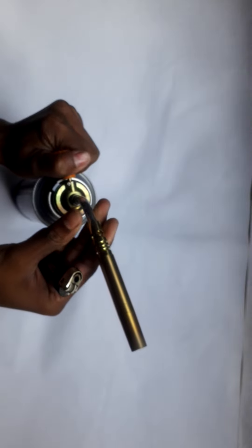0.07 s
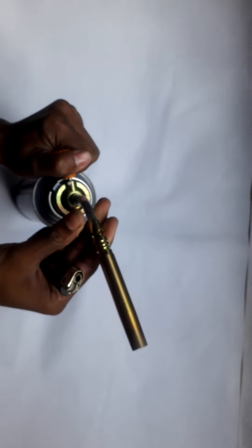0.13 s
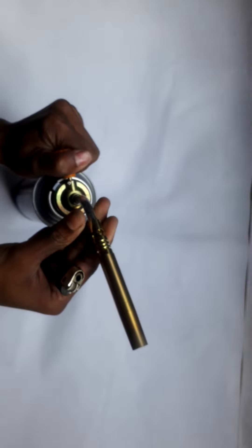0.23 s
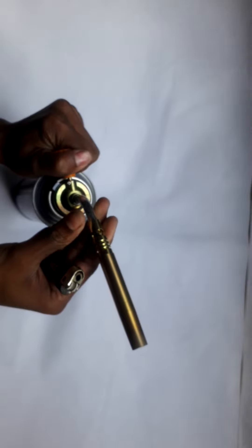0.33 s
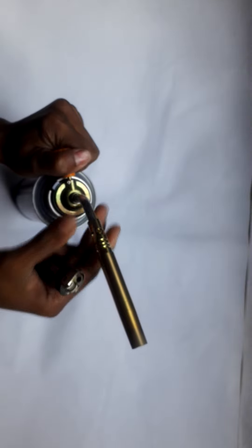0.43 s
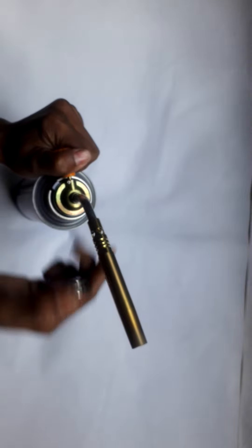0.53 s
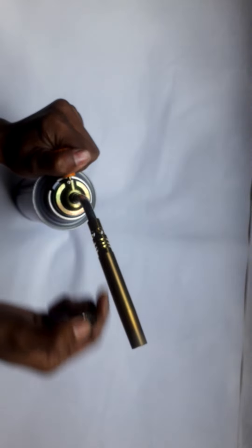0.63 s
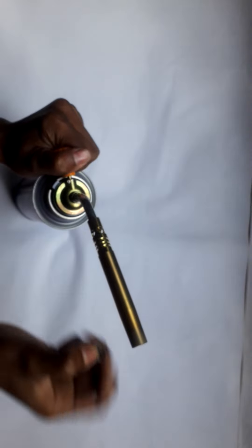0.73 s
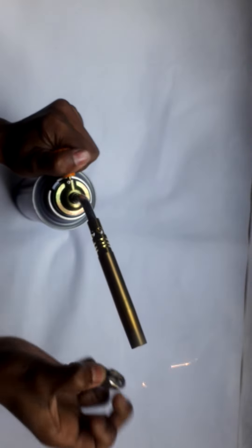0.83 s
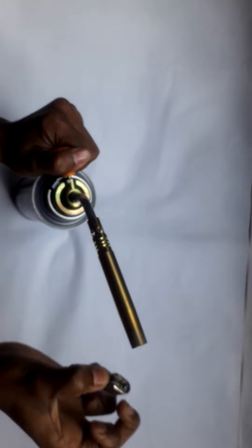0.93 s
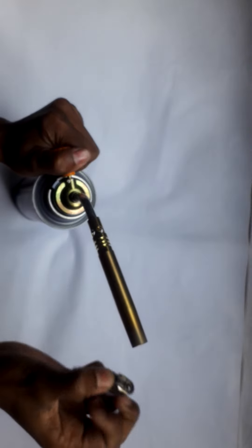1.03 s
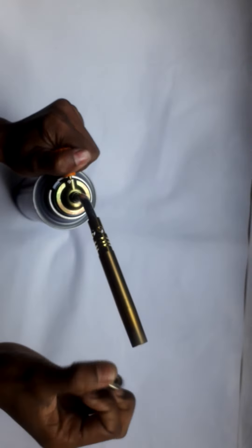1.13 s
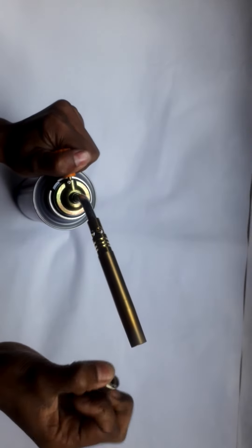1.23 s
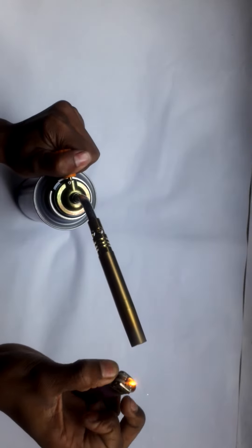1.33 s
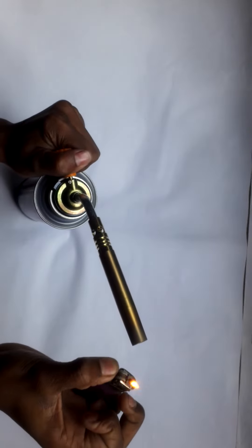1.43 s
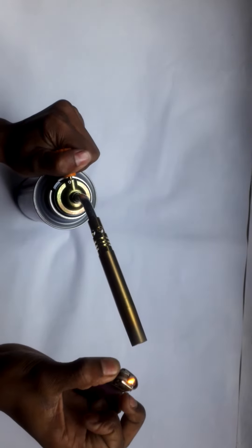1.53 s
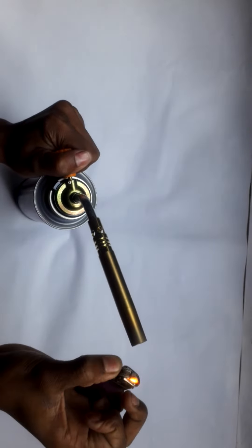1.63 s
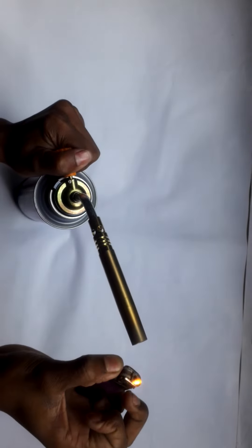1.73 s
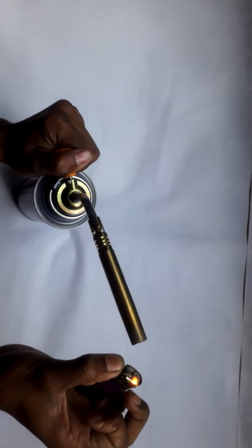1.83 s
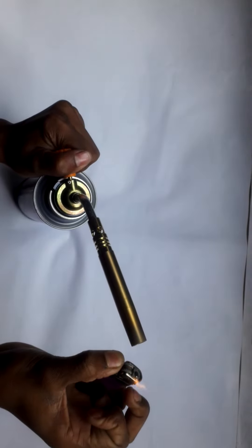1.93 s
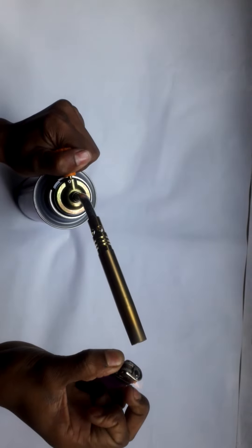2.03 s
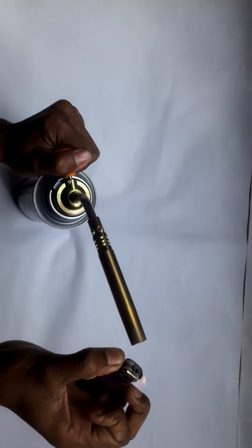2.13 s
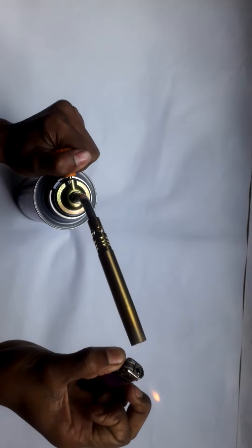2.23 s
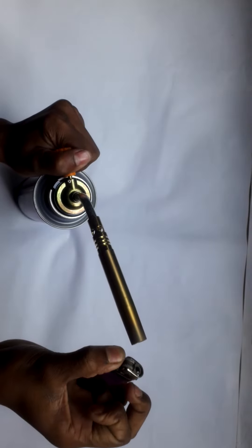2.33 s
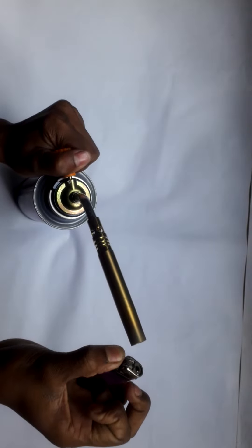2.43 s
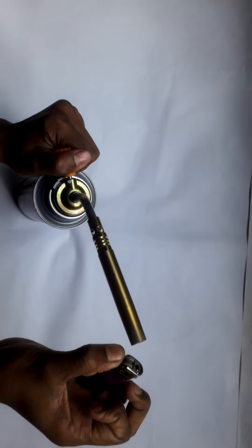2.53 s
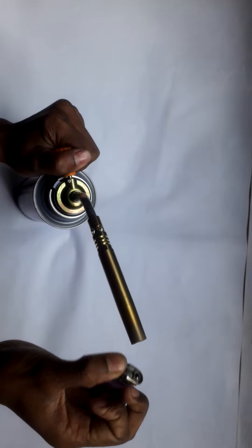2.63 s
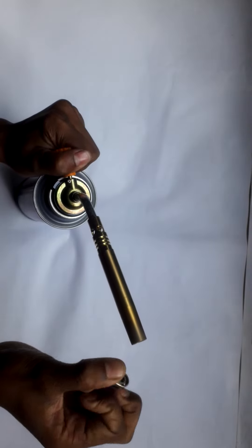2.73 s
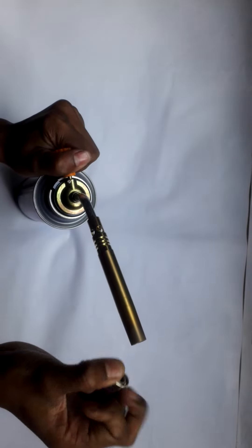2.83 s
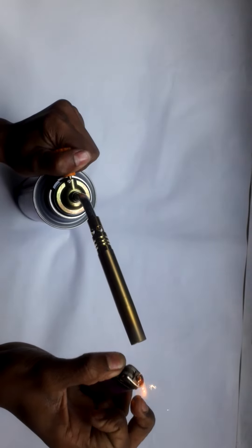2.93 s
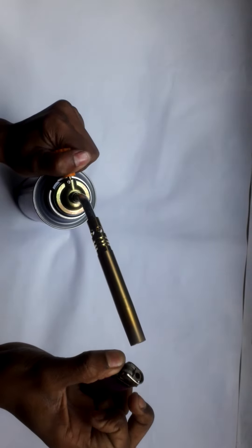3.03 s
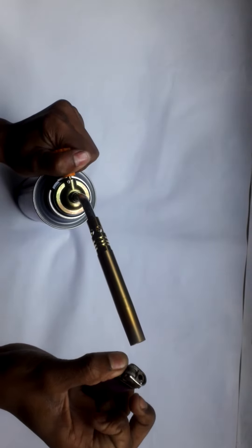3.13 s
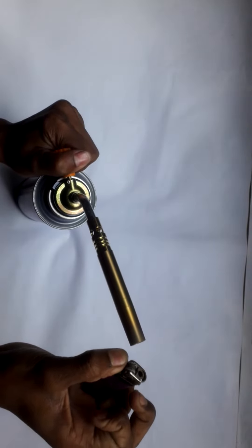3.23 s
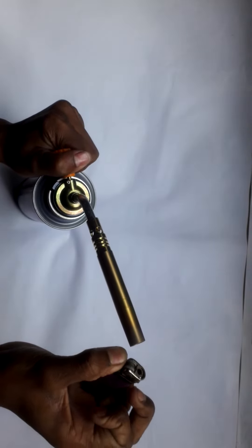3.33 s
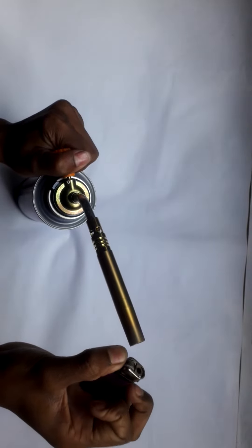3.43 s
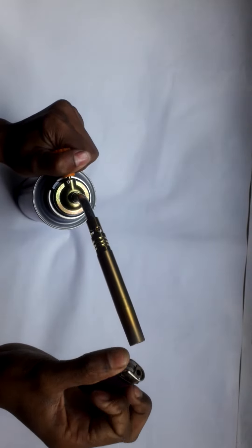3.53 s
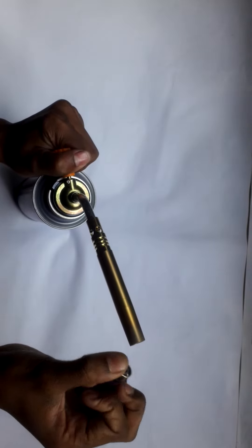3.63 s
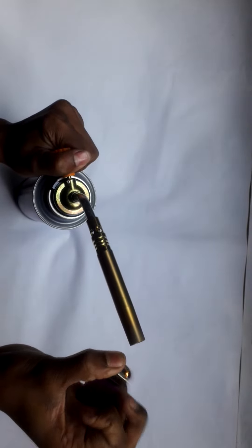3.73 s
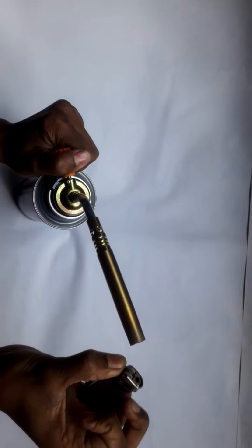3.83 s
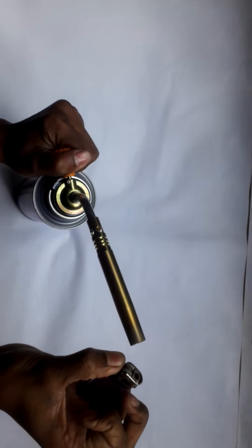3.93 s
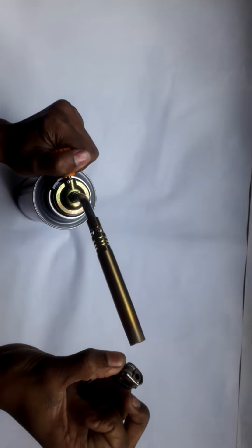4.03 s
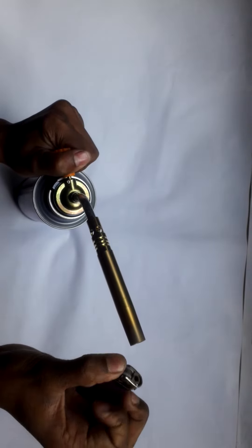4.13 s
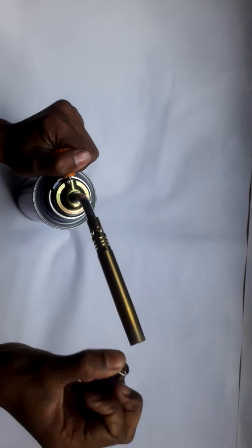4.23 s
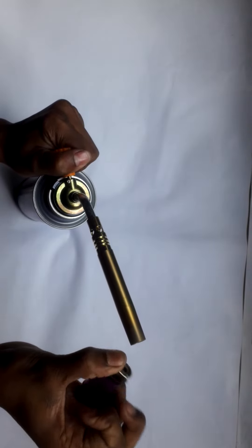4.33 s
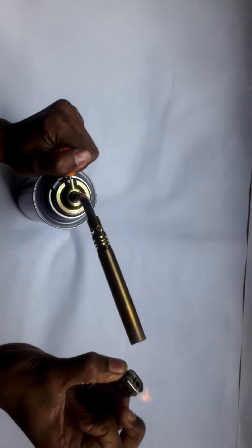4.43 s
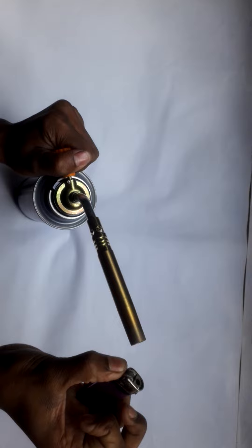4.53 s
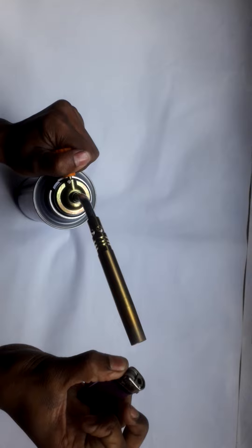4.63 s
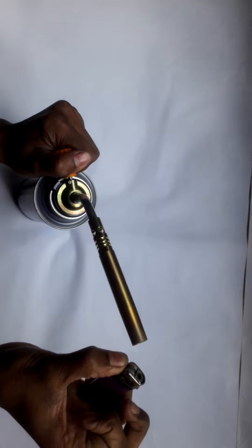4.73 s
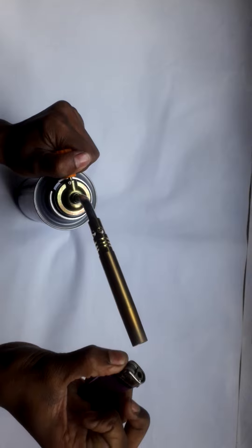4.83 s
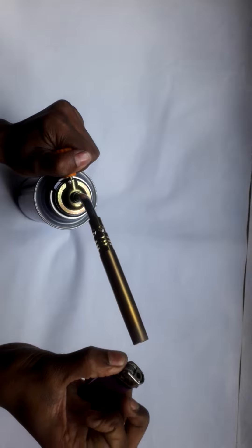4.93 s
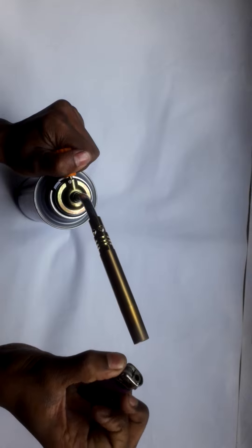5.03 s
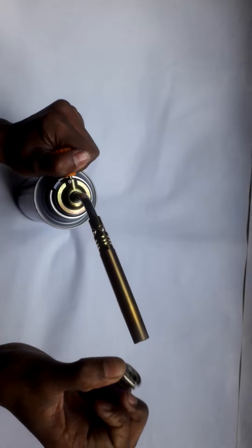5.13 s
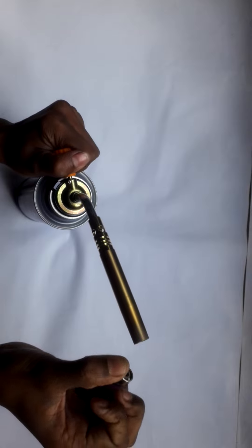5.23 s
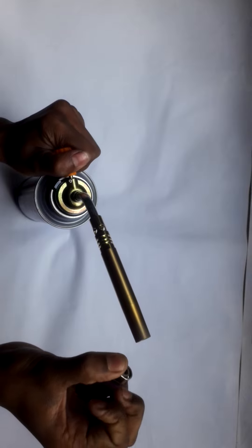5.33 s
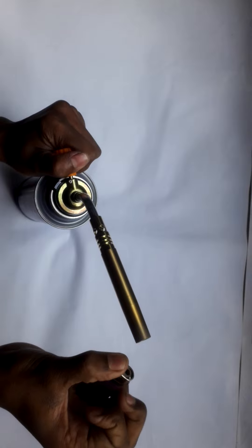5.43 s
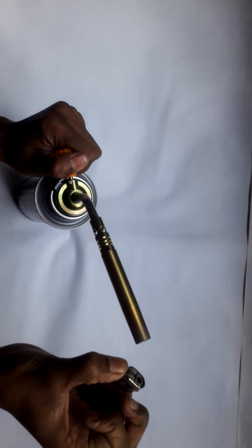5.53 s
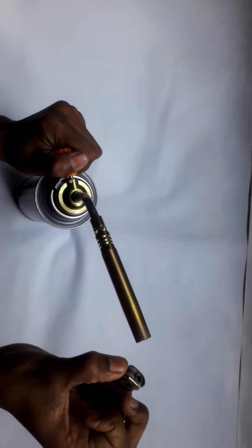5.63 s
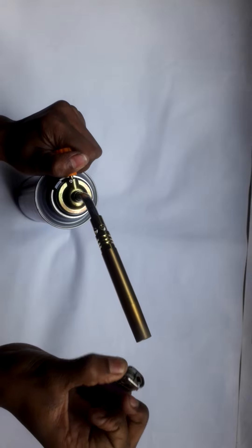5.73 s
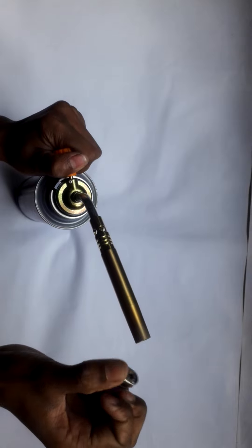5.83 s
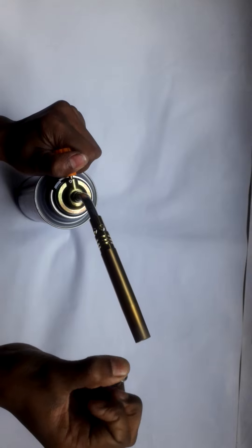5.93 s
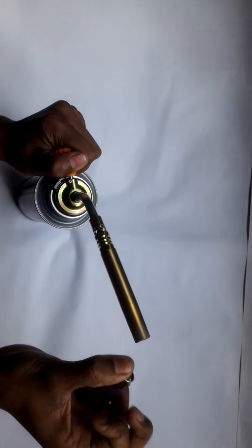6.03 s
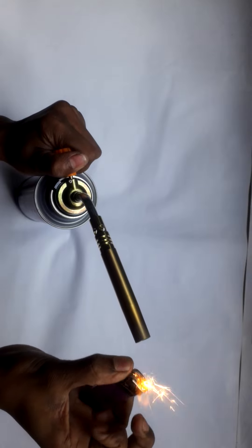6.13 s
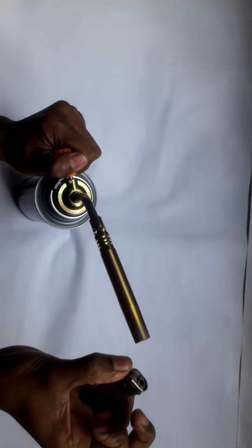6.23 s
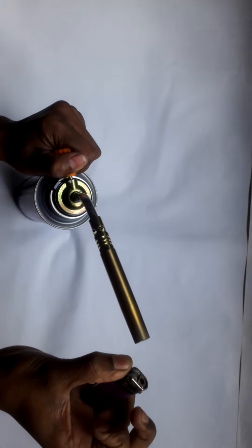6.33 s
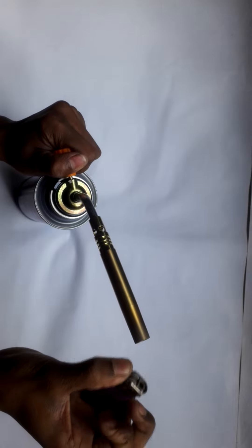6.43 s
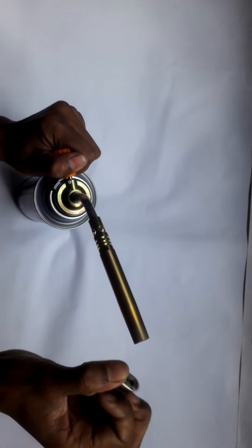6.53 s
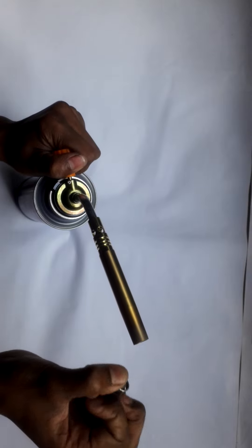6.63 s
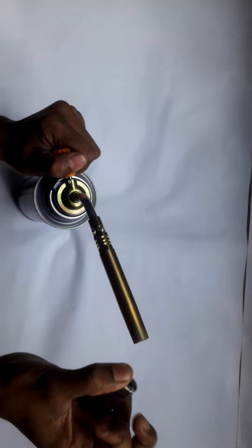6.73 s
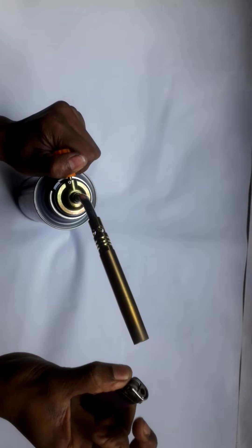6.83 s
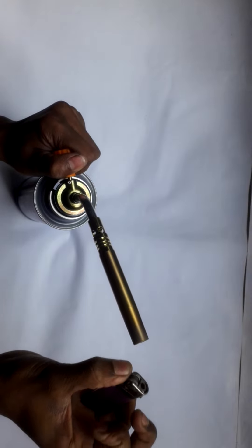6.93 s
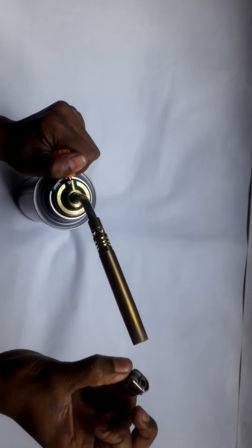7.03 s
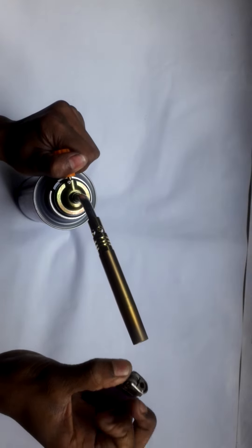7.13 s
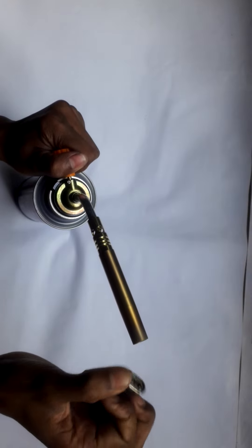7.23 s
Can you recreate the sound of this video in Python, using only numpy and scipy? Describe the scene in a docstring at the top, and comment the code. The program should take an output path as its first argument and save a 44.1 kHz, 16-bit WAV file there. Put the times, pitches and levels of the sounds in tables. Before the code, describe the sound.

In a quiet room, close up, a valve spits briefly and a hand scuffs. Unlit gas begins as a faint whistling hiss from a slim metal tube. A flint lighter is struck eight times, each a crisp rasp with a small low puff. One flame flutters and blows out. The gas ebbs, then swells into a loud turbulent hiss after five seconds and settles slightly.

```python
"""In a quiet room a valve spits, then butane hisses unlit through a brass torch tube whose air column whistles.
The hand scuffs, and a flint lighter is struck again and again: each rasp brings a puff that does not hold.
Faint tones glide far away as the gas ebbs; one flame flutters and is blown out. The flow then surges, turns
turbulent and eases. Filtered noise makes the gas, flint, flame and room; sines make knocks and far tones."""
import sys
import numpy as np
from scipy import signal
from scipy.fft import irfft, next_fast_len
from scipy.io import wavfile
from scipy.ndimage import uniform_filter1d

SR = 44100
rng = np.random.default_rng(int(sys.argv[2]) if len(sys.argv) > 2 else 0)


def int16_out(signal):
    """Quantize to a 16-bit WAV file."""
    q = np.round(np.clip(np.atleast_2d(signal).T, -1, 1) * 32767)
    wavfile.write(sys.argv[1], SR, q.astype(np.int16))


N = 320607

# Colour tables hold spectral density: frequency_hz, relative_db (each noise is later scaled to unit power).
# In all tables left_db is the left level over the right, and lead_rad the phase lead of the left.

# still room: frequency_hz, relative_db
ROOM_COLOUR = [(25, -18), (55, -3), (110, 1), (200, -4.5), (500, -7), (1000, -11.5), (1600, -15.5),
               (1950, -4), (2300, -13.5), (4000, -23), (9000, -25), (16000, -28)]
ROOM_T60_S = 0.38

# first spit of the opening valve: level_db, attack_s, hold_s, t60_s
SPIT_ENVELOPE = (-68, 0.015, 0.075, 0.5)
SPIT_AT_S = 0.129
# colour of the spit: frequency_hz, relative_db
SPIT_SPECTRUM = [(4200, -24), (5000, -4), (6300, -8), (7700, 0.5), (8600, -6), (9500, -24)]

# gas flow as the hand works the valve: time_s, flow_db (relative)
GAS_FLOW = [(0.19, -132), (0.27, -88), (0.42, -69), (0.77, -60.5), (1.05, -60), (1.3, -56), (1.58, -67),
            (2.45, -65.5), (3.3, -69), (3.53, -56.5), (3.8, -52), (4.72, -50.7), (4.91, -43.8),
            (5.14, -43.5), (5.42, -39.5), (5.8, -44), (6.45, -48), (7.27, -49.5)]
# lowest tube resonance: frequency_hz, width_hz, relative_db, left_db, lead_rad
TUBE_WHISTLE = (1355.5, 72, 0, -3.5, 0.62)
# upper tube resonances: frequency_hz, width_hz, level_db (at a flow of -47.5 dB), left_db, lead_rad,
# growth (dB per dB of flow)
TUBE_OVERTONES = [(3402, 115, -56.5, -11, -1.5, 0.56), (5224, 235, -52.5, -7.5, -2, 0.76),
                  (6954, 200, -46, -7.5, -2, 1.0), (7360, 390, -58, -6.5, -3, 1.5),
                  (7920, 180, -52.5, 3.5, 3.5, 1.2), (8260, 266, -46.5, -4.5, 4, 1.36),
                  (10170, 170, -62, -15, -2.1, 1.5)]
# turbulence around the resonances, low to high: frequency_hz, relative_db
ROAR_COLOUR = [(150, -33), (400, -21.5), (750, -9), (1100, -15), (1300, -2), (1550, 5), (1800, -7),
               (2300, -9), (3000, -21), (4500, -51)]
HISS_COLOUR = [(2700, -26), (3100, -4.5), (3750, -2), (4250, -5.5), (4900, -12.5), (5650, 2), (6100, 0.5),
               (6700, 0.5), (7550, -6.5), (8600, 4), (9200, -22), (11000, -9), (15000, -42)]
SIZZLE_COLOUR = [(3000, -20.5), (6000, -13), (9500, -1.5), (10400, 1.5), (11100, -3.5), (12000, 8),
                 (12600, 1), (13600, 4), (14500, 5.5), (15700, -3), (17000, -10)]
# around this flow the jet breaks into full turbulence, over a range of this width
BREAKUP_DB, BREAKUP_WIDTH_DB = -46.5, 2.4
# smooth jet at that flow: relative level; then dB per dB of flow, and rise once turbulent
WHISTLE_DB, WHISTLE_GROWTH, WHISTLE_SURGE_DB = -56, 0.41, 15.5
SIZZLE_DB, SIZZLE_GROWTH, SIZZLE_SURGE_DB = -65, 0.65, 21

# hollow scuff as the hand draws away: start_s, level_db, attack_s, hold_s, t60_s
SCUFF_ENVELOPE = (0.572, -57, 0.075, 0.02, 0.45)
# colour of the scuff: frequency_hz, relative_db
SCUFF_SPECTRUM = [(200, -30.5), (340, -17), (410, -4.5), (470, 0.5), (550, -17), (800, -28), (1000, -17),
                  (1200, -24), (2500, -33)]

# flint wheel strikes, each lighting a puff of gas: rasp_peak_s, rasp_db, half_length_s, thump_db, pop_db
# (rasp and thump relative)
FLINT_STRIKES = [(.862, -25, 0.0038, -53.5, -63.5), (1.3203, -26.5, .003, -50, -68),
                 (2.9244, -23, .0032, -42.5, -56), (3.803, -25, 0.0034, -43.5, -53),
                 (4.4067, -25, .003, -39, -62), (5.523, -32, .0055, -47, -42.5),
                 (6.174, -21.5, .002, -39, -50.5), (6.8065, -25, .0029, -39, -55)]
# the thumb nudges the wheel without a spark: time_s, relative_db, half_length_s
WHEEL_NUDGES = [(2.7165, -50, .0016), (5.865, -35, .001), (6.567, -32, 0.0018)]
# the wheel's run-up lies this far under the rasp; the gas catches this long after it
RUN_UP_DB, IGNITION_DELAY_S = -15.5, 0.01314
# colour of the flint's rasp: frequency_hz, relative_db
RASP_COLOUR = [(150, -28), (700, -16), (1500, -8.5), (2700, -9), (3300, -6), (4400, 2.5), (5300, -1.5),
               (7300, 2.5), (8900, 0.5), (9400, 1), (11500, 1.5), (14000, -4), (16000, -5)]
# ring of the lighter's steel hood: frequency_hz, width_hz, added_gain_db (relative to the rasp's colour)
HOOD_RING = [(8050, 180, 8.5), (8820, 140, 9.5)]
# the wheel sliding before it bites: frequency_hz, relative_db
SLIDE_COLOUR = [(1500, -26), (4000, -7), (6500, -5), (7900, 5), (8800, -17), (9600, -11), (12000, -9),
                (16000, -20)]
# the lighter's case knocks in the hand: start_s, frequency_hz, relative_db, t60_s
CASE_KNOCKS = [(0.86, 1753, -34, 0.03), (.862, 690, -49, 0.062)]

# the jet blows the flame out: time_s, thump_db (relative), pop_db
FLAME_BLOWOUTS = [(2.318, -39, -69), (5.565, -48, -46.5)]
# colour of the flame's rumble: frequency_hz, relative_db
RUMBLE_COLOUR = [(25, -30), (50, -4), (90, 1), (135, 2), (200, -4.5), (280, -17), (600, -27), (1000, -42),
                 (2500, -61)]
# colour of the flame's dry pop: frequency_hz, relative_db
POP_COLOUR = [(100, -12), (220, 0), (800, 6), (1200, -12), (3000, -26)]
# before the first blowout the flame flutters harder and harder: length, final level, growth
FLUTTER_S, FLUTTER_DB, FLUTTER_GROWTH_DB_PER_S = 0.426, -56, 20

# faint far tones: start_s, length_s, start_hz, end_hz, relative_db, octave_db (relative to the fundamental)
FAR_GLIDES = [(1.522, 0.31, 1028, 1070, -71.5, -6), (1.868, 0.28, 1077, 1050, -75, -2),
              (3.885, 0.23, 730, 625, -70, -21), (4.755, 0.23, 730, 676, -74, -20),
              (6.278, .33, 652, 601, -73, -18), (6.857, 0.42, 509, 482, -71, -20)]
FAR_BREATHINESS = 0.85  # amplitude weight of the noisy part, 0-1

CUTOFF_HZ = 15760


def from_db(db):
    """Logarithmic level: 20 dB is a tenfold amplitude."""
    return np.exp(np.maximum(db, -300) * np.log(10) / 20)


def rms_one(x):
    """Normalisation: scale to unit mean power."""
    return x / np.sqrt(np.mean(x ** 2) + 1e-20)


def seconds():
    """Sampling: the time of every sample."""
    return np.arange(N) / SR


def bins_hz():
    """Discrete spectrum: frequencies of the FFT grid, kept above zero for logarithms."""
    return np.fft.rfftfreq(next_fast_len(N + 64, True), 1 / SR) + 1e-3


def colour(points):
    """Spectral shaping: gain interpolated in dB over logarithmic frequency."""
    hz, db = np.transpose(points)
    return from_db(np.interp(np.log(bins_hz()), np.log(hz), db))


def resonance(hz, width_hz):
    """Damped resonance: a rounded peak whose far skirts fall away steeply."""
    off = (bins_hz() - hz) / width_hz
    return 1 / np.sqrt((1 + (2 * off) ** 2) * (1 + (off / 2.54) ** 2))


def pan(left_db):
    """Level difference between the ears: half is given to each channel, with opposite sign."""
    return from_db(np.array([[left_db], [-left_db]]) / 2)


def noise(gain, alike, left_db, lead=0):
    """Partial coherence: coloured stereo noise whose left channel is partly a phase-led copy of the right."""
    common, own = rng.standard_normal((2, 2 * gain.shape[-1])).view(complex)
    alike = np.clip(alike, 0, .99)
    left = alike * np.exp(1j * lead) * common + np.sqrt(1 - alike ** 2) * own
    stereo = irfft(np.array([left, common]) * gain)[:, :N]
    return rms_one(stereo) * pan(left_db)


def drift(rate_hz):
    """Low-pass random process: noise smoothed by two equal poles to unit RMS."""
    pole = np.exp(-2 * np.pi * rate_hz / SR)
    white = rng.standard_normal(N + SR)
    smooth = signal.lfilter([1], [1, -2 * pole, pole * pole], white)
    return rms_one(smooth[SR:])  # the filter settles during the first second


def envelope(start_s, db, attack_s, hold_s, t60_s):
    """Exponential decay after a linear rise and a hold."""
    age = seconds() - start_s
    fade_db = -60 * np.maximum(age - attack_s - hold_s, 0) / t60_s
    return np.clip(age / attack_s, 0, 1) * from_db(db + fade_db)


def room(x, early_db, late_db, early_t60=0.16):
    """Reverberation: quick reflections from table and walls, a longer tail, and air taking off their top."""
    t = np.arange(SR // 2) / SR
    white = rng.standard_normal((2, len(t))) * (t > .004)
    early = rms_one(from_db(-60 * t / early_t60)) / np.sqrt(len(t))
    late = rms_one(from_db(-60 * t / ROOM_T60_S)) / np.sqrt(len(t))
    response = white * np.hypot(from_db(early_db) * early, from_db(late_db) * late)
    response = signal.lfilter(*signal.butter(1, 13000, fs=SR), response)
    return x + signal.fftconvolve(x, response, axes=1)[:, :N]


def standing_waves(spread_db, spacing_hz):
    """Interference: reflections lift and sink narrow strips of a steady sound, differently at each ear."""
    hz = bins_hz()
    strips = np.arange(0, SR / 2, spacing_hz)
    depth = spread_db * np.clip(hz / 5000, 0, 1)
    ripple = rng.standard_normal((2, len(strips)))
    ripple = ripple - uniform_filter1d(ripple, size=7)  # little change of level over a broad band
    return from_db(depth * np.array([np.interp(hz, strips, row) for row in ripple]))


def still_room():
    """Diffuse background: steady noise of low coherence between the ears."""
    return from_db(-71.0) * noise(colour(ROOM_COLOUR), alike=0.34, left_db=7.5)


def valve_spit():
    """Transient outflow: the opening valve releases a brief burst of bright noise."""
    return envelope(SPIT_AT_S, *SPIT_ENVELOPE) * noise(colour(SPIT_SPECTRUM), alike=0.3, left_db=-9)


def jet_levels():
    """Transition to turbulence: all levels grow with flow, and whistle and sizzle surge at break-up."""
    flow_db = np.interp(seconds(), *np.transpose(GAS_FLOW))
    excess_db = flow_db - BREAKUP_DB
    turbulent = (1 + np.tanh(excess_db / BREAKUP_WIDTH_DB / 2)) / 2
    whistle_db = WHISTLE_DB + WHISTLE_GROWTH * excess_db + WHISTLE_SURGE_DB * turbulent
    sizzle_db = SIZZLE_DB + SIZZLE_GROWTH * excess_db + SIZZLE_SURGE_DB * turbulent
    return whistle_db, flow_db, sizzle_db


def torch():
    """Resonance under turbulent excitation: the jet sounds the tube's air column amid roar, hiss and sizzle."""
    whistle_db, flow_db, sizzle_db = jet_levels()
    hiss_db = flow_db + 0.47 * drift(rate_hz=36)
    walls = standing_waves(spread_db=3, spacing_hz=32)

    hz, width, db, left_db, lead = TUBE_WHISTLE
    out = from_db(whistle_db + db) * noise(resonance(hz, width), 1.0, left_db, lead)

    roar_db = whistle_db - 8.5 + 0.3 * (whistle_db + 47)
    out += from_db(roar_db) * noise(walls * colour(ROAR_COLOUR), alike=0.75, left_db=-2.0, lead=-0.75)

    for hz, width, db, left_db, lead, growth in TUBE_OVERTONES:
        overtone = noise(walls * resonance(hz, width), alike=0.94, left_db=left_db, lead=lead)
        out += from_db(db + growth * (hiss_db + 47.5)) * overtone

    out += from_db(hiss_db - 4) * noise(walls * colour(HISS_COLOUR), alike=0.59, left_db=-4, lead=-1.9)
    sizzle = noise(walls * colour(SIZZLE_COLOUR), alike=0.45, left_db=-9, lead=1.57)
    return out + from_db(sizzle_db + 4) * sizzle


def hand_scuff():
    """Friction noise: the hand scuffs away from the torch in a hollow band of noise."""
    return envelope(*SCUFF_ENVELOPE) * noise(colour(SCUFF_SPECTRUM), alike=0.39, left_db=-6.0)


def lighter(grain_db=4.0, run_up_s=0.012):
    """Friction excitation: the wheel gathers speed, then its teeth tear at the flint in uneven grains."""
    t, bite, run_up = seconds(), np.zeros(N), np.zeros(N)
    for s, db, half, *_ in FLINT_STRIKES + WHEEL_NUDGES:
        run_up += from_db(db + RUN_UP_DB) * np.exp(-np.abs(t - s) / run_up_s) * (t < s)
        bite += from_db(db) * np.exp(-((t - s) / half) ** 2 / 2)

    grains = rms_one(from_db(grain_db * np.clip(drift(rate_hz=1750), -2, 2)))
    hood = sum(from_db(db) * resonance(hz, width) for hz, width, db in HOOD_RING)
    tearing = bite * noise(colour(RASP_COLOUR) * (1 + hood), alike=0.33, left_db=-9, lead=1.8)
    sliding = run_up * noise(colour(SLIDE_COLOUR), alike=0.26, left_db=-11.5, lead=4.3)
    dry_lighter = grains * (tearing + sliding)

    for s, hz, db, t60 in CASE_KNOCKS:
        age = np.maximum(t - s, 0)
        dry_lighter += from_db(db - 60 * age / t60) * np.sin(2 * np.pi * hz * age)
    return room(from_db(-1) * dry_lighter, early_db=-6.5, late_db=-12.5)


def flutter(attack_s=0.07, t60=0.091):
    """Unstable combustion: gain of a rumble growing unevenly until the jet blows the flame out."""
    out_s = FLAME_BLOWOUTS[0][0]
    growth_db = FLUTTER_GROWTH_DB_PER_S * np.minimum(seconds() - out_s, 0)
    burning = envelope(out_s - FLUTTER_S - attack_s, FLUTTER_DB, attack_s, FLUTTER_S, t60)
    return burning * from_db(growth_db + 2.4 * drift(rate_hz=22))


def flame(push_s=0.0014, tail_db=-8, tail_t60=0.28, pop_t60=0.086):
    """Volume displacement: each ignition or blowout pushes the air, pops and leaves a dying rumble."""
    t, push, pop = seconds(), np.zeros(N), np.zeros(N)
    rumble = flutter()
    ignitions = [(s + IGNITION_DELAY_S, db, pop_db) for s, _, _, db, pop_db in FLINT_STRIKES]
    for s, db, pop_db in ignitions + FLAME_BLOWOUTS:
        age = t - s
        fade = -60 * np.maximum(age, 0)
        rise = np.clip(1 + age / 0.012, 0, 1)
        # one positive, then one negative swing of pressure
        push -= from_db(db + 2.0) * age / push_s * np.exp(-(age / push_s) ** 2 / 2)
        rumble += from_db(db + tail_db + fade / tail_t60) * rise
        pop += from_db(pop_db + fade / pop_t60) * rise
    thump = push + rumble * noise(colour(RUMBLE_COLOUR), alike=0.88, left_db=1.0, lead=-0.81)
    return thump + pop * noise(colour(POP_COLOUR), alike=0.67, left_db=-3.5, lead=-0.96)


def far_tones(blur_hz=55):
    """Random modulation: gliding tones and their octaves turn breathy, and the room blurs them."""
    t, out = seconds(), np.zeros(N)
    blur = (drift(blur_hz) + 1j * drift(blur_hz)) / np.sqrt(2)
    breath = np.sqrt(1 - FAR_BREATHINESS ** 2) + FAR_BREATHINESS * blur
    for s, length, start_hz, end_hz, db, octave_db in FAR_GLIDES:
        along = np.clip((t - s) / length, 0, 1)
        pitch_hz = start_hz + (end_hz - start_hz) * along ** 2
        turn = np.exp(2j * np.pi * np.cumsum(pitch_hz) / SR)
        tone = (turn + from_db(octave_db) * turn * turn) * breath  # squaring the phasor gives the octave
        swell = np.sqrt(np.abs(np.sin(np.pi * along)))
        out += from_db(db) * swell * tone.real
    return room(out * pan(left_db=-10), early_db=-18, late_db=-7)


def scene():
    """Superposition: the pressures of all sources add."""
    gas = valve_spit() + torch()
    return still_room() + gas + hand_scuff() + lighter() + flame() + far_tones()


def record(dry):
    """Band limitation: the microphone loses the deepest bass, and the top is cut steeply."""
    thin = signal.sosfilt(signal.butter(3, 40, "high", fs=SR, output="sos"), dry)
    return signal.sosfilt(signal.ellip(12, .1, 80, CUTOFF_HZ, fs=SR, output="sos"), thin)


dry = scene()
out = record(dry)
int16_out(out)
```